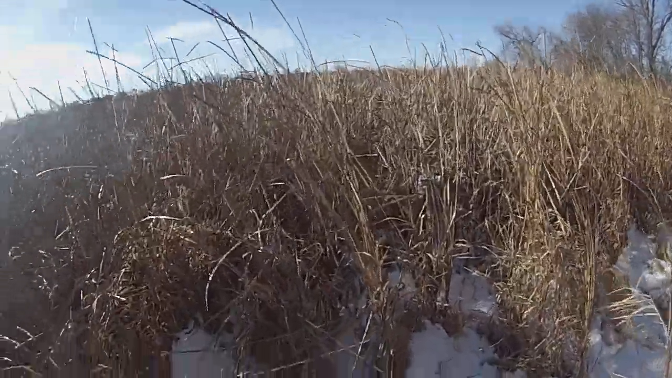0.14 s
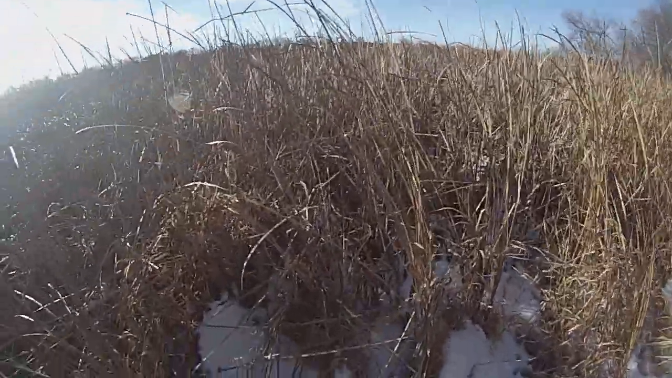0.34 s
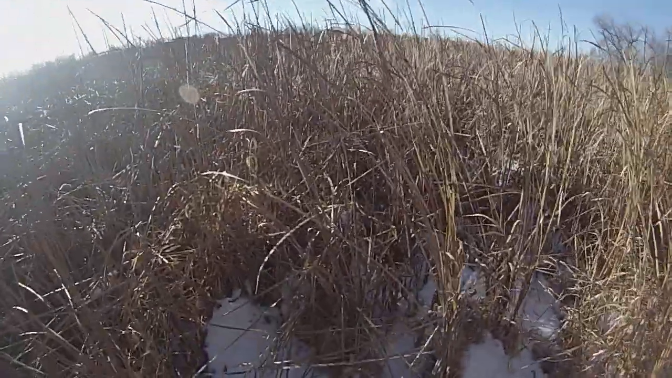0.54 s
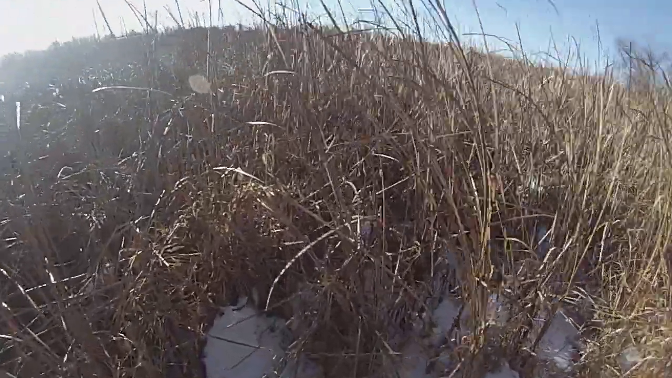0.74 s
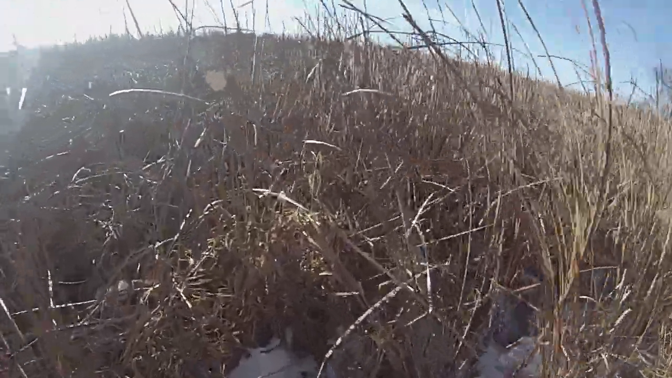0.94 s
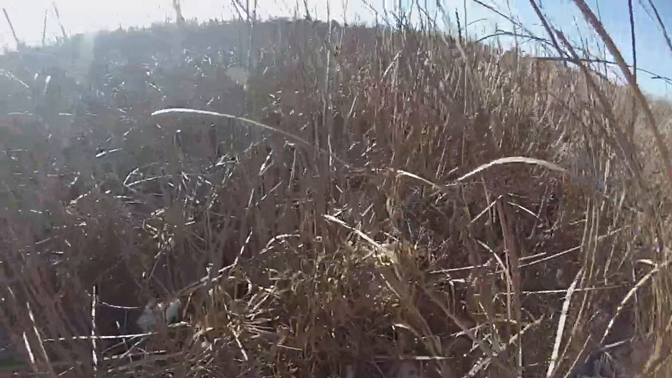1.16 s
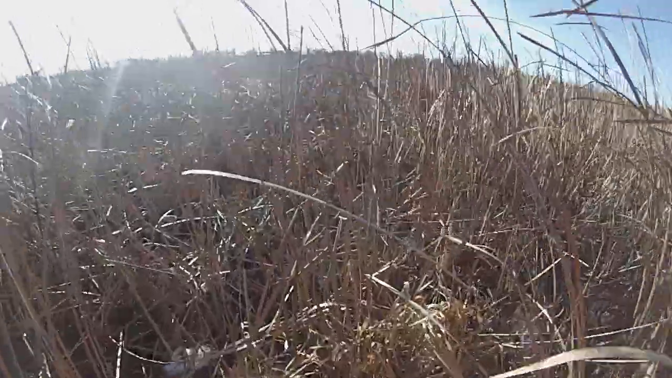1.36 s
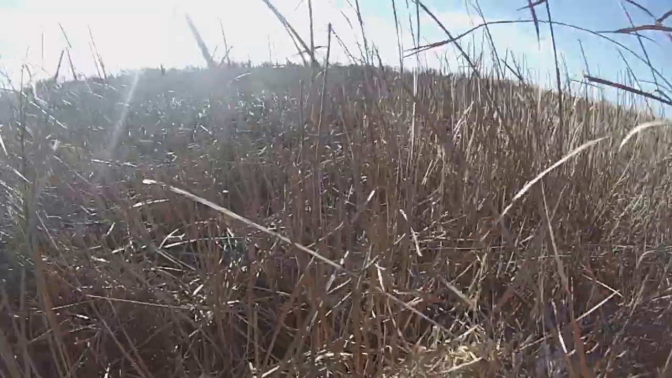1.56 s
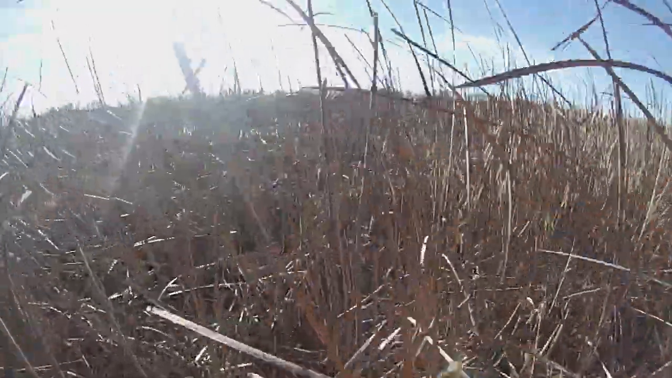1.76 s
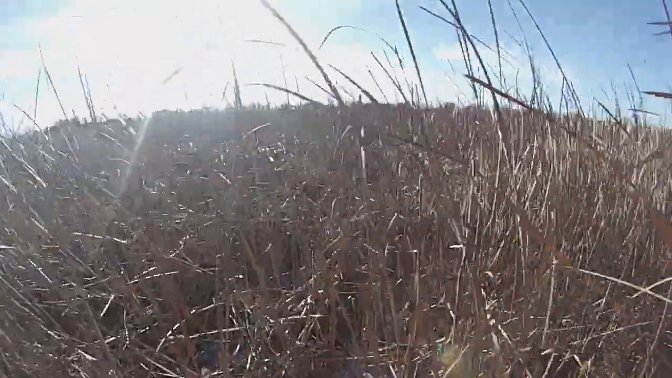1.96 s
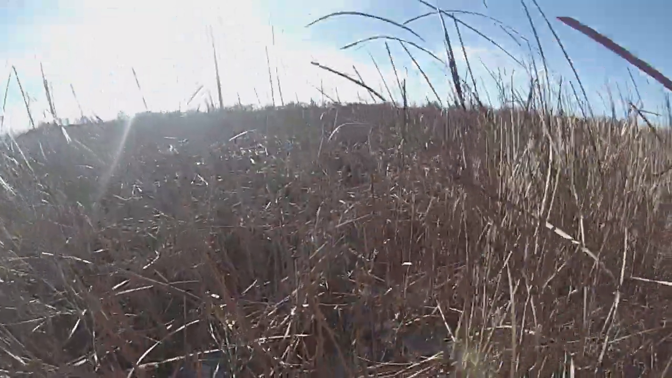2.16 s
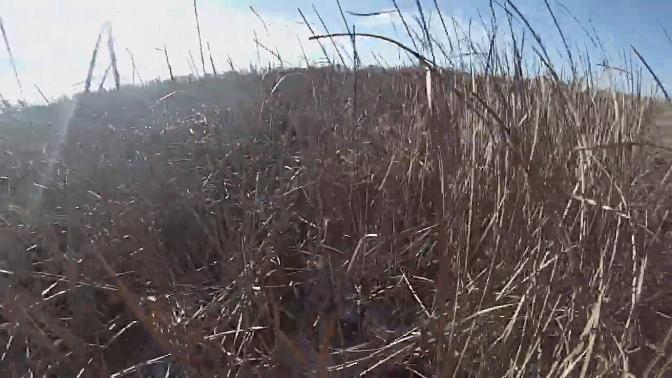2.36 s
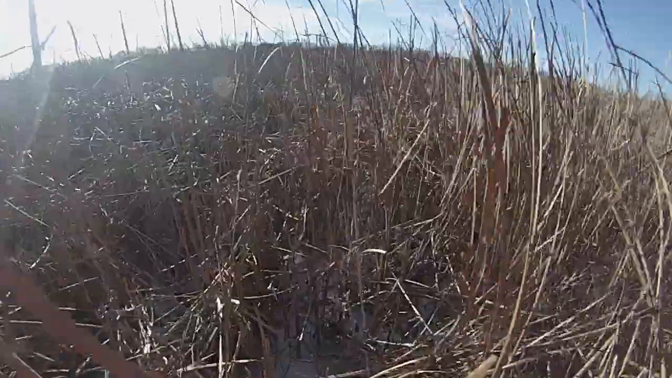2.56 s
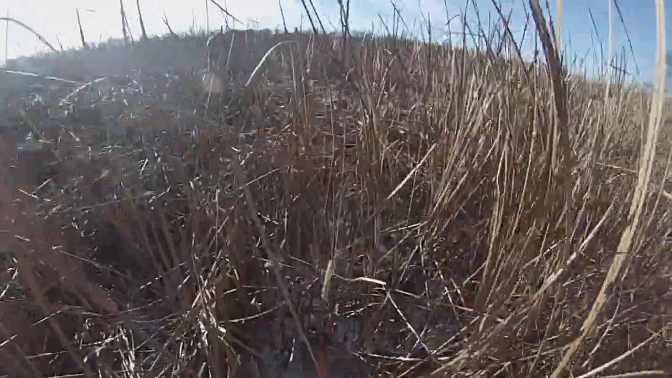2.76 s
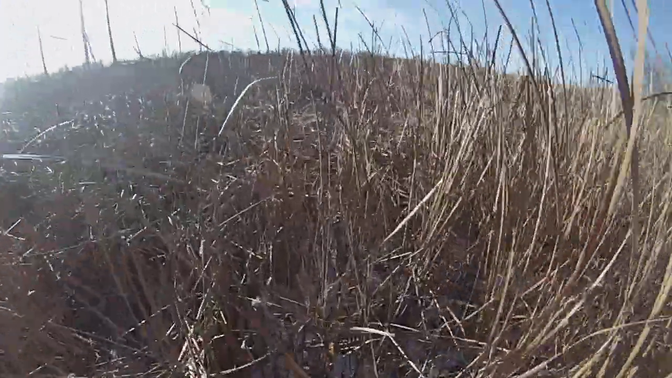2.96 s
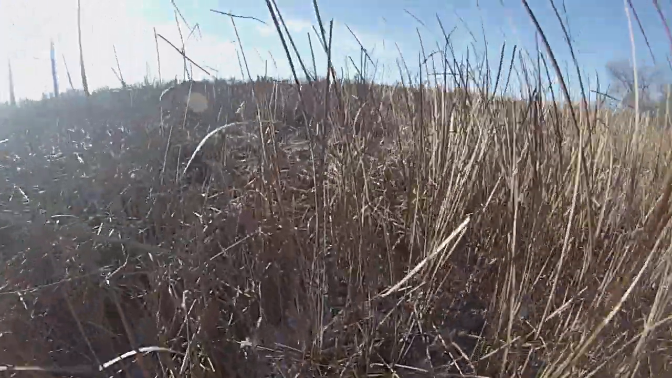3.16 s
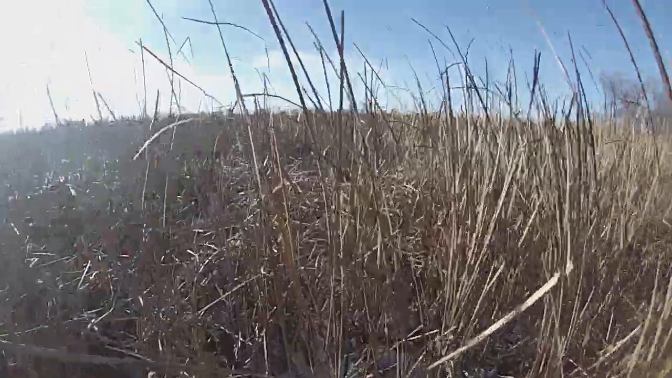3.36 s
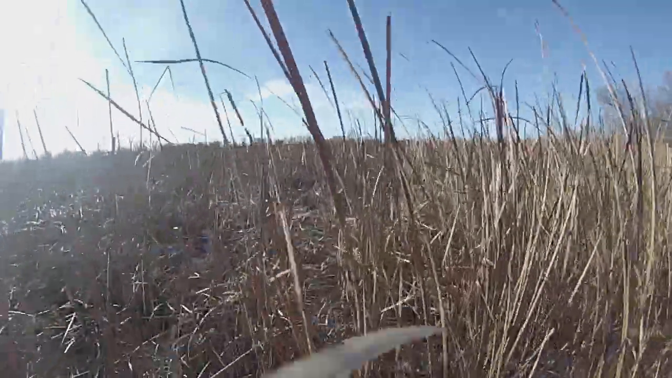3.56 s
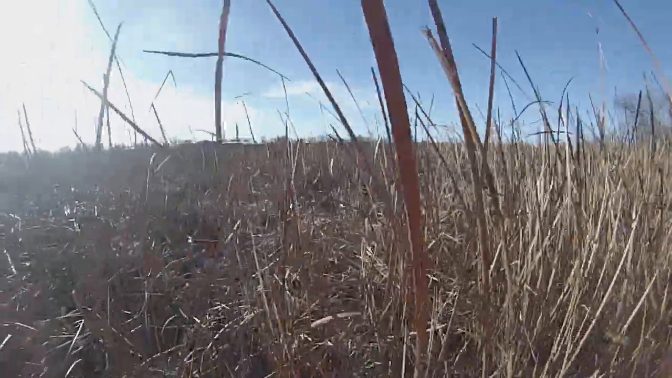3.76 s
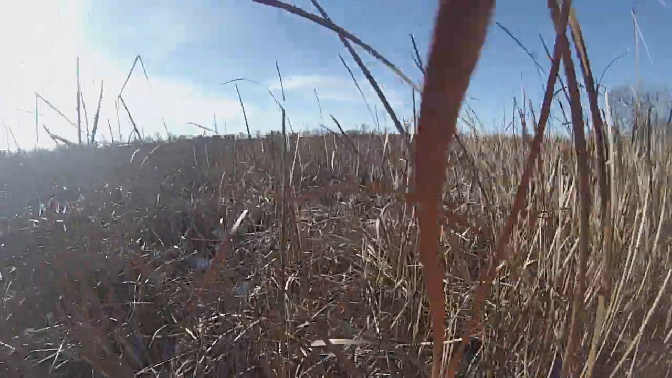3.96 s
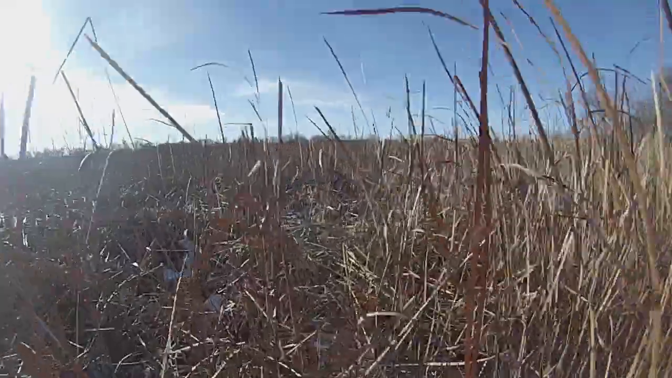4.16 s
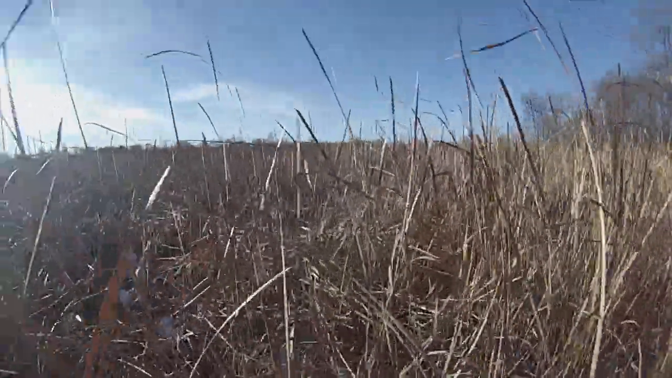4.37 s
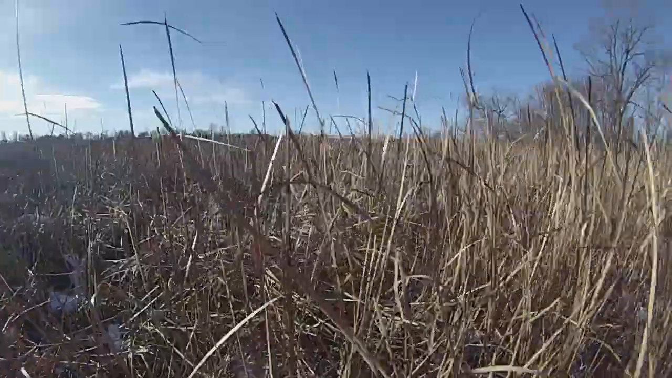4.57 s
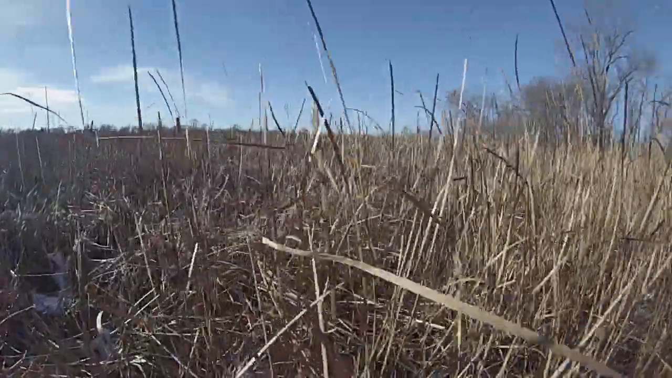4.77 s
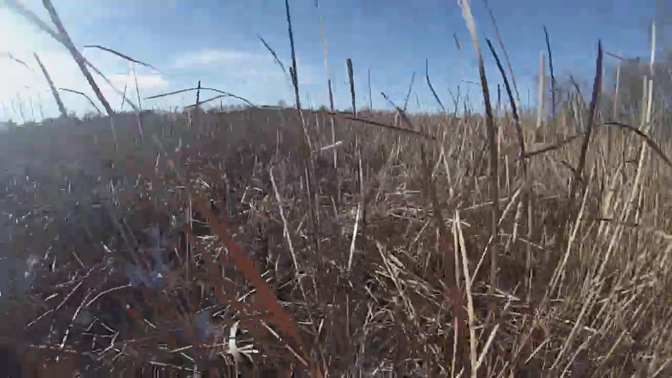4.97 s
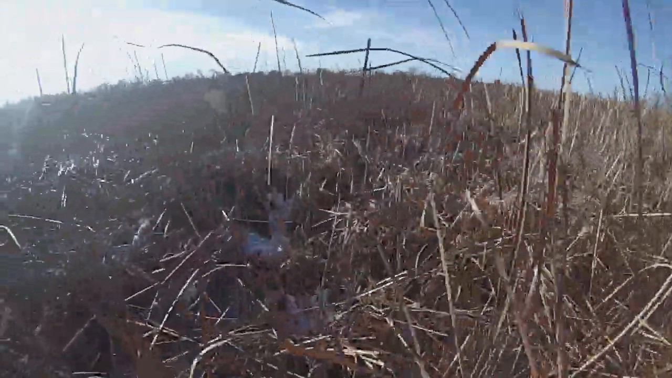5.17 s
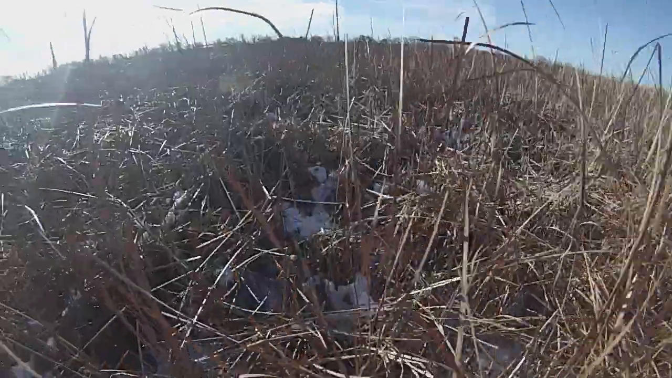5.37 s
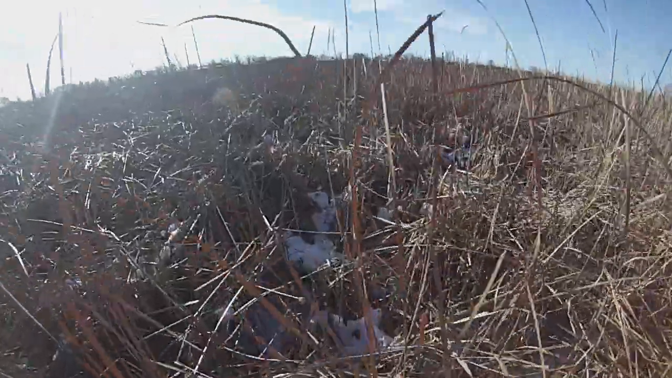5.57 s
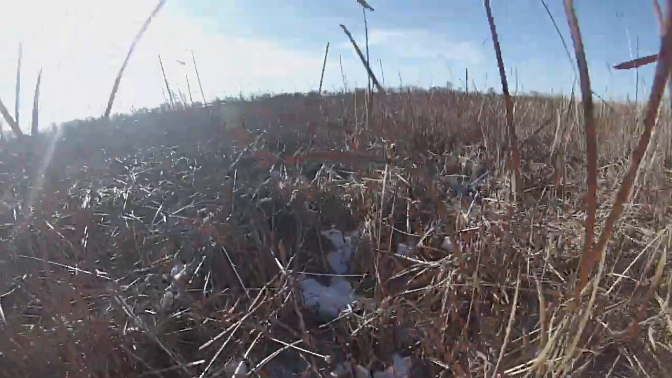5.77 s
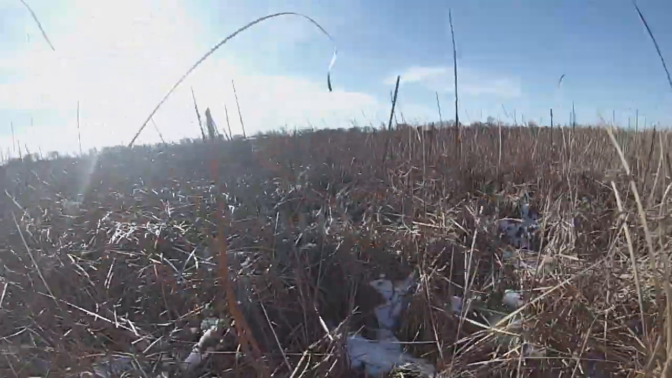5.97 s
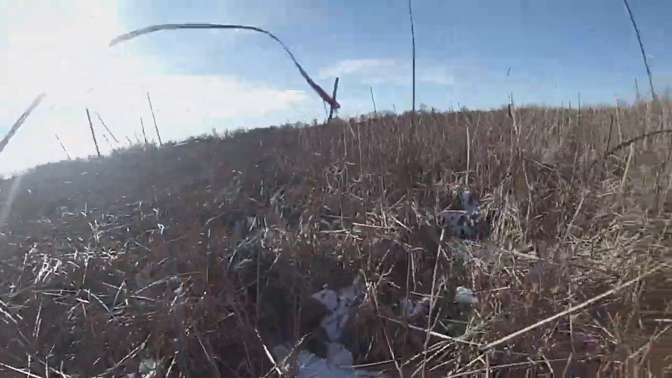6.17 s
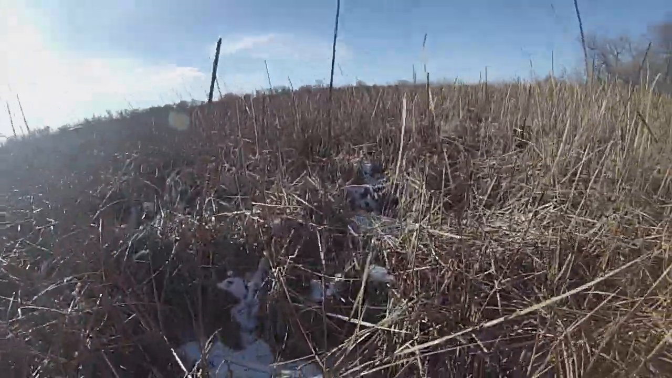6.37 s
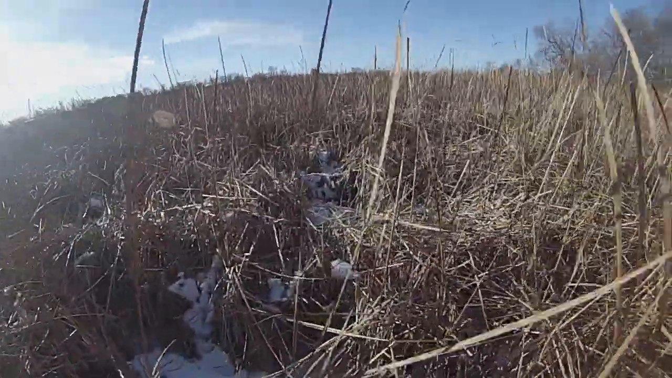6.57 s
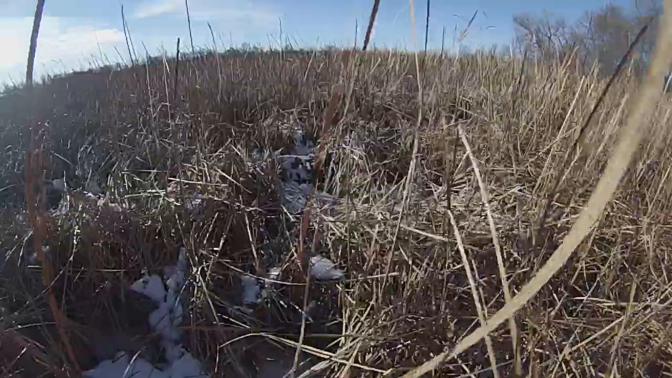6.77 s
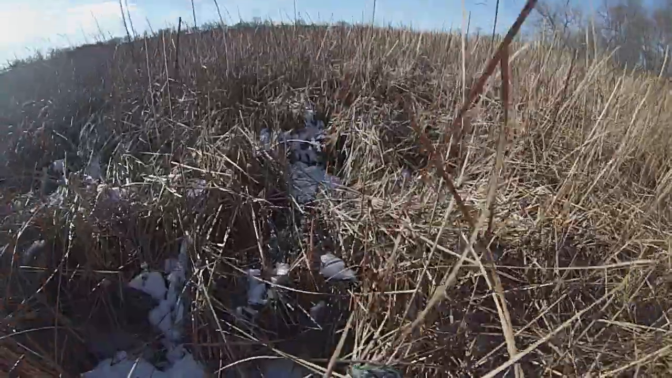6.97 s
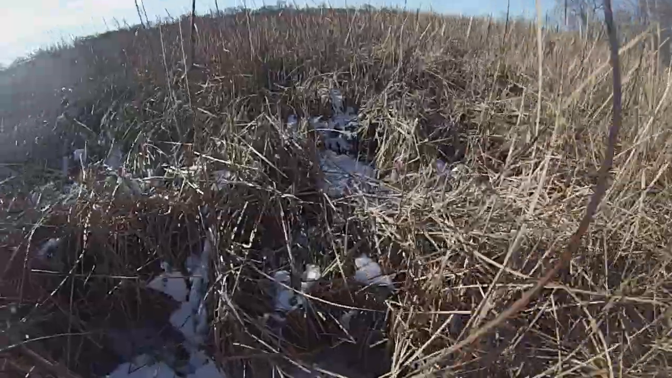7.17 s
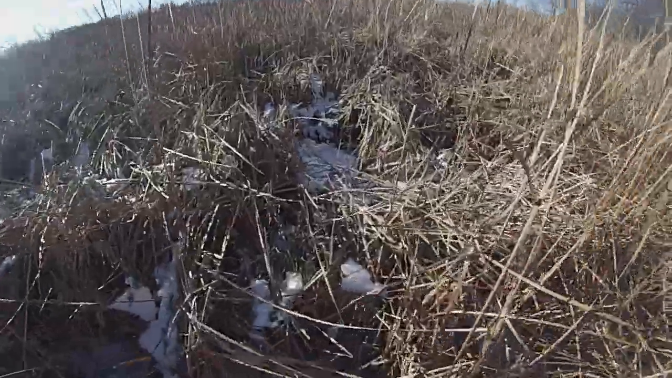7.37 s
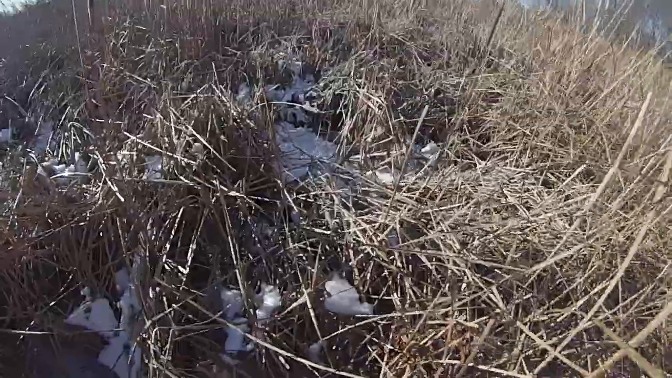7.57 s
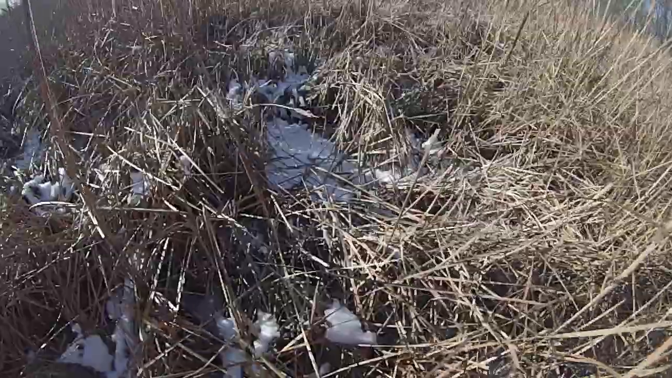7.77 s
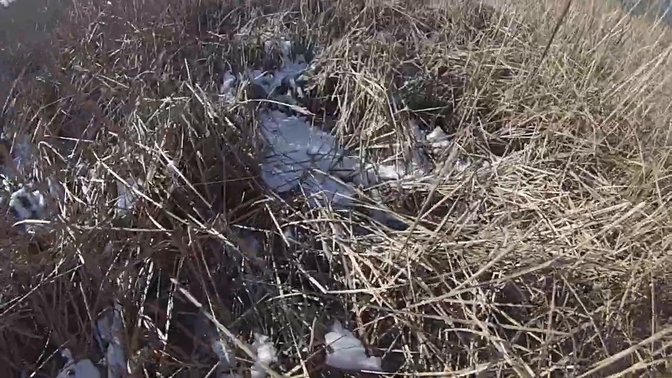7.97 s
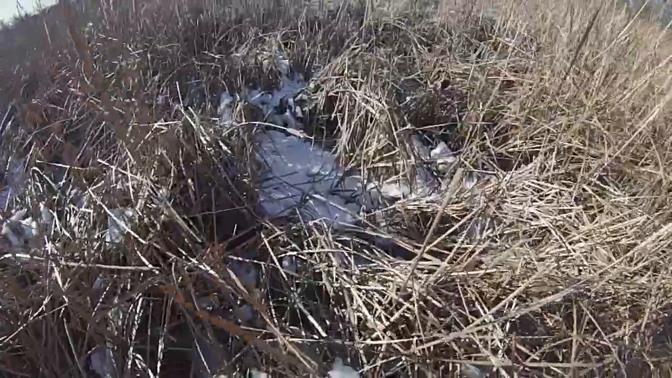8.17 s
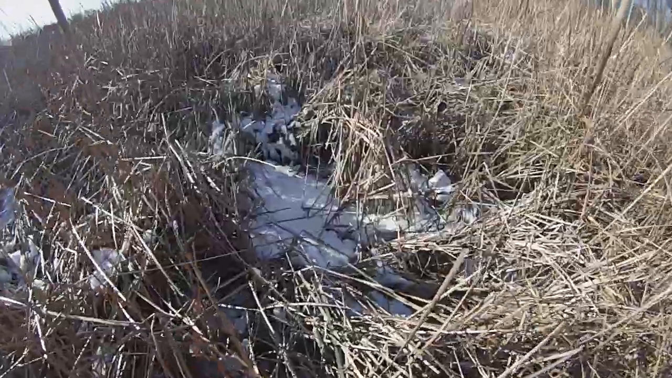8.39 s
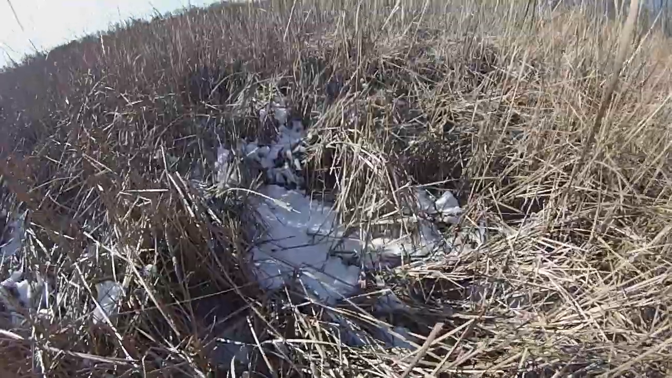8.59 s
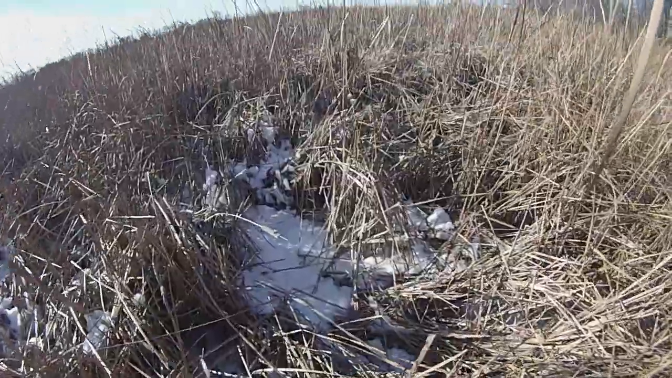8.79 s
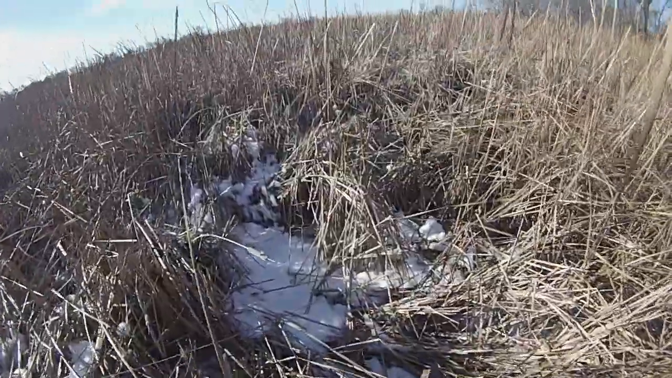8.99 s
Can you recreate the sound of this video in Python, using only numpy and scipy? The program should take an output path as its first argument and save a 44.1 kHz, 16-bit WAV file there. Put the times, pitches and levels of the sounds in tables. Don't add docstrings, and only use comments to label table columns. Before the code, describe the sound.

A small camera in a closed plastic housing is carried through a dry, snowy reed marsh. It starts nearly quiet with faint hiss, then crackling rustle swells as stalks brush past. Stalks tap and tear on the shell; one drags and chatters into a knock, and soon a much louder crack strikes. Rustling, tearing ticks and deep handling thumps continue to the end. Very close, dry, mono, boxy sound.

```python
import sys
import numpy as np
from scipy import signal
from scipy.fft import rfft, irfft
from scipy.io import wavfile
from scipy.ndimage import uniform_filter1d, minimum_filter1d

SR = 44100
rng = np.random.default_rng(int(sys.argv[2]) if len(sys.argv) > 2 else 0)


def wav_record(signal):
    frames = np.transpose(np.atleast_2d(signal))
    bounded = np.clip(frames, -1, 1)
    quanta = np.round(bounded * 32767).astype(np.int16)
    wavfile.write(sys.argv[1], SR, quanta)


def amplitude_ratio(level_db):
    exponent = np.asarray(level_db, float) / 20
    return 10 ** exponent


N = 398223


def rms_one(x):
    return x / np.sqrt(np.mean(x ** 2) + 1e-20)


def curve(rows):
    s, *columns = np.transpose(rows)
    return [np.interp(np.arange(N) / SR, s, c) for c in columns]


def band(x, low_hz, high_hz):
    return signal.sosfilt(signal.butter(2, [low_hz, high_hz], "band", fs=SR, output="sos"), x)


def drift(rate_hz):
    r = np.exp(-2 * np.pi * rate_hz / SR)
    slow = signal.lfilter([1], [1, -2 * r, r * r], rng.standard_normal(N + SR))
    return rms_one(slow[SR:])


def resonate(x, peaks):
    out = 0
    for k, (hz, width_hz, level_db) in enumerate(peaks):
        r = np.exp(-np.pi * width_hz / SR)
        a = [1, -2 * r * np.cos(2 * np.pi * hz / SR), r * r]
        out = out + (-1) ** k * amplitude_ratio(level_db) * signal.lfilter([(1 - r * r) / 2, 0, (r * r - 1) / 2], a, x)
    return out


def ring(hz, t60, size):
    t = np.arange(size) / SR
    onset = 1 - np.exp(-(2.68 * hz * t) ** 2)
    return np.sin(2 * np.pi * hz * t) * amplitude_ratio(-60 * t / t60) * onset


def add(out, s, piece):
    at = round(s * SR)
    out[at:at + len(piece)] += piece[:N - at]


def crackle(per_s, spread_db, clump_db, smooth):
    clump = drift(22.0)
    sizes = amplitude_ratio(spread_db * np.minimum(rng.exponential(1, N), 5)) * rng.choice([-1, 1], N)
    grains = sizes * (rng.random(N) < per_s / SR)
    return rms_one(amplitude_ratio(clump_db * clump) * (rms_one(grains) + smooth * rng.standard_normal(N)))


# t/s, push level/dB, brightness/dB
PUSH = [(0.0, -70, -5), (.55, -71.5, -2.5), (.8, -70.5, -2), (1.38, -68, -4), (1.62, -59.5, 0.5),
        (1.91, -61.5, -2.5), (2.78, -62.5, -2), (3.0, -59, 0), (3.8, -61, -5.5), (4.3, -61.5, -1.5),
        (5.09, -62, -3.5), (5.66, -61, -2), (6.21, -58.5, -2.5), (7.13, -60, -2), (7.68, -62.5, -1),
        (8.55, -61.5, -5), (8.88, -63, -2), (9.03, -57.5, -1.5)]
# start t/s, length/s, swell/dB
SWEEPS = [(0.865, 0.12, 5.5), (1.976, 0.23, 2.5), (2.344, 0.18, 4), (2.617, 0.1, 2.5), (2.87, 0.07, 3),
          (3.162, 0.22, 3), (3.642, .07, 1), (4.0, 0.15, 2), (4.72, 0.36, 2), (6.372, .08, 0),
          (6.52, 0.17, 2.5), (7.04, 0.053, 0.5), (7.197, 0.32, 4.5), (7.37, 0.11, 2.6), (7.848, 0.11, 4),
          (8.028, 0.13, 5.5), (8.625, 0.22, 2.5)]
# f/Hz, width/Hz, level/dB
LOW = [(349, 530, 0.11), (737, 860, 2)]
# f/Hz, width/Hz, level/dB
CAVITY = [(1590, 303, 0.5), (2474, 390, -1), (3106, 710, -3.5)]
# f/Hz, width/Hz, level/dB
PORT = [(5420, 510, 2), (6810, 390, -4), (7870, 590, -2.5), (9800, 1500, -6.5), (12200, 2750, -9),
        (15740, 1500, -20.5)]


def rustle():
    edge_s, fade_s = 0.072, 0.096
    brightens, sharpens = 0.54, 0.21
    push_db, shine_db = curve(PUSH)
    t = np.arange(0, N, 40) / SR
    swell_db = 0
    for s, length, db in SWEEPS:
        slope = np.minimum((t - s) / edge_s, (s + length - t) / fade_s)
        swell_db = swell_db + db * np.clip(slope + .5, 0, 1)
    swell_db = np.interp(np.arange(N) / SR, t, swell_db)
    grain = crackle(2500., spread_db=4.0, clump_db=1.5, smooth=1.9)
    low = rms_one(band(resonate(grain, LOW), 180, 1250))
    dull = amplitude_ratio(1.03 * drift(2.8)) * rms_one(band(resonate(grain, CAVITY), 1250, 4000))
    bright = rms_one(band(resonate(grain, PORT), 3900, 18000))
    top_gain = amplitude_ratio(sharpens * swell_db + 1.2 * drift(5.0))
    bright = bright + (top_gain - 1) * band(bright, 7000, 17000)
    body = amplitude_ratio(0.46) * (dull + amplitude_ratio(-11.5) * low)
    return amplitude_ratio(push_db + swell_db) * (body + amplitude_ratio(shine_db + brightens * swell_db + 2.0) * bright)


def snap(ring_hz, t60, ring_db, bright_db, knock_db, port, clean):
    fibres = rng.standard_normal(2500) * amplitude_ratio(-60 * np.arange(2500) / SR / (0.56 * t60))
    fibres[3] += clean
    crack = resonate(fibres, port)
    pair = ring(ring_hz, t60, size=2500) + 0.4 * ring(ring_hz * 1.3, 0.48 * t60, size=2500)
    pair = band(pair, 0.97 * ring_hz, 1.9 * ring_hz)
    push = band(np.arange(2500) == 3, 62, 777)
    knock = 0.56 * ring(820, 0.01, size=2500) + 0.19 * ring(560, 0.0086, size=2500)
    knock = knock + 1.15 * push / push.max()
    return amplitude_ratio(ring_db) * pair + amplitude_ratio(bright_db) * crack / np.abs(crack).max() + amplitude_ratio(knock_db) * knock


# t/s, level/dB, ring f/Hz, ring t60/s, bright level/dB
BLOWS = [
    (1.103, -21, 1850, 0.0039, -10),
    (1.7077, -11, 1900, 0.0053, -5),
    (4.2624, -4, 1720, 0.017, -21),
    (4.263, -9, 2550, 0.013, -33),
    (4.263, -15.5, 3186, 0.018, -28),
    (5.1593, 16, 2950, 0.0047, -5.5),
    (5.1594, 0.5, 1730, 0.0092, -17.5),
    (5.1594, -0.5, 2450, 0.008, -31),
    (5.1614, -2, 3140, 0.0063, -3.5),
]
# t/s, level/dB, ring f/Hz
CHATTER = [
    (4.2376, -20.5, 2180),
    (4.2425, -12.5, 1800),
    (4.245, -23.5, 2590),
    (4.249, -17, 1790),
    (4.252, -23, 1680),
    (4.257, -27, 2330),
    (4.2707, -21.5, 2350),
]
# f/Hz, t60/s, level after the side blow/dB, level after the front blow/dB
LONG_MODES = [(916, 0.047, -28.5, -38.5), (1660, 0.073, -39.5, -29.5), (1850, 0.19, -37.5, -34),
              (2180, 0.066, -24.5, -21.5), (2550, 0.036, -37.5, -18), (2950, 0.045, -35.5, -18),
              (4700, 0.045, -55, -28), (5220, 0.031, -45, -17.5), (710, 0.028, -24, -38)]
# f/Hz, width/Hz, level/dB
CRACK = [(5570, 1000, 0), (7700, 1800, 1), (10900, 1400, -4), (13300, 1300, -14.5)]


def blows():
    side_blow_s, front_blow_s = 4.2624, 5.1592
    knock_growth = 1.31
    out = np.zeros(N)
    for s, level_db, hz in CHATTER:
        add(out, s, snap(hz, 0.018, level_db, level_db - 26, level_db - 15.5, CRACK, clean=5.0))
    for s, level_db, hz, t60, bright_db in BLOWS:
        knock_db = knock_growth * level_db - 33.5
        add(out, s, snap(hz, t60, level_db + 3.5, level_db + bright_db, knock_db, CRACK, clean=4.4))
    for hz, t60, side_db, front_db in LONG_MODES:
        add(out, side_blow_s, amplitude_ratio(side_db) * ring(hz, t60, size=12000))
        add(out, front_blow_s, amplitude_ratio(front_db) * ring(hz, t60, size=12000))
    return signal.sosfilt(signal.butter(4, 14500, fs=SR, output="sos"), out)


# t/s, level/dB, ring f/Hz, knock level/dB
TAPS = [(0.5097, -43, 1660, -69), (1.038, -48, 1470, -51), (1.5997, -36, 1620, -50),
        (1.868, -37, 1830, -70), (2.0325, -41, 1740, -61), (2.1449, -32.5, 1540, -48),
        (2.146, -37, 2500, -64), (2.486, -34, 1640, -50), (3.6663, -54, 1540, -54),
        (3.693, -35.5, 1250, -46.5), (3.7227, -29, 2210, -46.5), (3.8114, -42, 1940, -50),
        (3.8533, -46, 1800, -65), (3.889, -40, 1700, -66), (3.9556, -33, 2940, -57),
        (3.9893, -34, 2050, -53), (4.023, -38, 1840, -48), (4.195, -26, 1780, -70),
        (4.292, -39.5, 1860, -46.5), (4.919, -45, 1510, -48), (5.5757, -40, 1970, -77),
        (5.9496, -31.5, 1700, -48), (6.4411, -35, 1660, -67), (6.9272, -40, 1570, -53),
        (7.2604, -48, 1560, -47), (8.1195, -44, 1650, -61), (8.44, -48, 1560, -53)]
# t/s, level/dB, ring level/dB
TEARS = [(0.68, -59, -53), (0.748, -58.5, -66), (0.8094, -58, -56), (0.849, -63, -58), (1.367, -52.5, -58),
         (1.442, -49.5, -50), (1.4833, -47, -54), (1.504, -48, -52), (1.7386, -47, -50), (1.843, -55, -47),
         (1.868, -49, -55), (2.0325, -51, -55), (2.343, -51, -58), (3.2016, -47, -42), (3.533, -53, -47),
         (4.3375, -55, -44), (4.354, -41.5, -45), (5.5454, -48.5, -43), (5.837, -43.5, -41),
         (6.4412, -48, -55), (6.5744, -47, -49), (6.6476, -47, -37), (6.7053, -49, -42), (7.2142, -49, -37),
         (7.275, -42.5, -52), (7.294, -39, -44), (7.379, -43, -45), (7.4403, -37.5, -42),
         (7.4609, -40, -39), (8.0784, -49, -47)]
TEAR_TILTS = [1, .1, .1, .1, -11, -2.1, -2.1, .1, .1, 2.1, 2.1, 2.1, .1, -2, -3, -5, -1, -2.1, -3, .1, 2,
              .1, .1, .1, 5, 5, -2, 2.1, -4, .1]
# f/Hz, width/Hz, level/dB
TEAR_PORT = [(5370, 800, -2), (8030, 910, 1), (9760, 1800, -3.5), (12500, 1500, -6.5)]
# t/s, length/s, level/dB
FLECKS = [
    (.092, 0.026, -70),
    (.188, .03, -73),
    (.228, 0.043, -72),
    (0.431, 0.018, -70),
]


def ticks():
    lowest_hz, highest_hz = 1500, 2710
    out = np.zeros(N)
    for s, level_db, hz, knock_db in TAPS:
        add(out, s + .0003, snap(hz, 0.016, level_db - 2.5, level_db - 22, knock_db + 3.5, TEAR_PORT, clean=.1))
    for (s, level_db, ring_db), tilt_db, chance in zip(TEARS, TEAR_TILTS, rng.random(len(TEARS))):
        hz = lowest_hz * (highest_hz / lowest_hz) ** (chance ** 2)
        port = [(port_hz, width_hz, db + tilt_db * np.log2(port_hz / 8000))
                for port_hz, width_hz, db in TEAR_PORT]
        add(out, s + .0003, snap(hz, 0.036, ring_db - 4.5, level_db + 6.0, level_db - 16, port, clean=.1))
    for s, length, level_db in FLECKS:
        whisper = band(rng.standard_normal(4000), 9000, 9700)[:int(length * SR)]
        add(out, s, amplitude_ratio(level_db) * rms_one(whisper))
    return out


# t/s, pressure level/dB
DRAG = [
    (3.8, -70),
    (3.812, -52),
    (3.83, -68),
    (3.945, -57),
    (3.965, -47),
    (4.07, -46),
    (4.16, -50.5),
    (4.19, -50.5),
    (4.232, -51),
]
# f/Hz, width/Hz, level/dB
PLATE = [(430, 250, -6), (890, 110, 2), (1220, 270, -4.5)]
# f/Hz, width/Hz, level/dB
SHELL = [(1800, 210, 3), (2450, 260, -3), (2940, 260, 0.5), (3880, 430, -13.5)]


def drag():
    source = crackle(1800., spread_db=4.5, clump_db=1.2, smooth=0.5)
    t = np.arange(N) / SR
    touching = np.clip(np.minimum(t - DRAG[0][0], DRAG[-1][0] - t) / 0.011, 0, 1)
    plate_db = -7.5 + 28 * np.clip(t - 4.0, 0, .2)
    plate = rms_one(band(resonate(source, PLATE), 250, 1600))
    cavity = rms_one(band(resonate(source, SHELL), 1300, 5000))
    bright = rms_one(band(resonate(source, PORT), 4300, 16000))
    return touching * amplitude_ratio(curve(DRAG)[0]) * (amplitude_ratio(plate_db) * plate + cavity + amplitude_ratio(-18) * bright)


# t/s, length/s, plate level/dB, cavity level/dB
RUBS = [(2.189, .012, -57, -64), (3.987, 0.022, -54, -40), (4.032, .006, -52, -43), (4.072, .006, -49, -40),
        (4.082, .005, -48, -45), (4.102, .005, -50, -48), (4.123, .012, -46.5, -49),
        (4.144, .016, -47, -47), (4.222, .016, -50.5, -45), (4.2373, .004, -40.5, -26),
        (4.241, 0.011, -34, -27.5), (4.255, .007, -38.5, -35.5), (4.267, .012, -38, -32.5),
        (4.289, .007, -50.5, -42), (6.018, .014, -57, -66), (8.103, .05, -58, -68), (8.125, .014, -57, -66),
        (8.42, .04, -63, -65)]
# t/s, length/s, level/dB, first f/Hz, last f/Hz
SQUEAKS = [
    (.838, .022, -65, 3000, 2800),
    (3.549, 0.024, -56, 3800, 3400),
    (3.587, .01, -56, 3330, 3700),
    (3.602, .03, -62, 3480, 3400),
    (3.587, 0.019, -58, 2600, 2520),
    (5.574, 0.009, -54, 3900, 4000),
    (3.843, .026, -54, 2950, 2500),
]


def rubs():
    to_plate, to_cavity, squeaks = np.zeros((3, N))
    for s, length, plate_db, cavity_db in RUBS:
        grit = (rng.standard_normal(3000) * rng.exponential(1, 3000))[:int(length * SR)]
        grit = grit * np.linspace(1, .4, len(grit))
        add(to_plate, s, amplitude_ratio(plate_db + 12.5) * grit)
        add(to_cavity, s, amplitude_ratio(cavity_db + 8.0) * grit)
    for s, length, level_db, first_hz, last_hz in SQUEAKS:
        size = int(length * SR)
        flutter = 1 + 0.56 * rms_one(band(rng.standard_normal(2000), 40, 250))[:size]
        tone = np.sin(2 * np.pi * np.cumsum(np.linspace(first_hz, last_hz, size)) / SR)
        add(squeaks, s, amplitude_ratio(level_db + 0.5) * np.hanning(size) ** .5 * flutter * tone)
    plate = band(resonate(to_plate + 1e-18, PLATE + [(650, 308, -2.5)]), 250, 1500)
    cavity = band(resonate(to_cavity + 1e-18, SHELL), 1300, 5000)
    return plate + cavity + squeaks


# t/s, level/dB, starting f/Hz
THUDS = [(.012, -33.5, 44), (.952, -27, 37), (1.768, -30.5, 53), (1.812, -28.5, 38), (2.49, -35.5, 50),
         (3.444, -35.5, 73), (3.467, -22.5, 32), (3.908, -33, 53), (4.147, -28.5, 55), (4.261, -27, 40),
         (4.33, -28.5, 58), (5.012, -32.5, 48), (5.845, -26, 48), (5.895, -28, 42), (6.482, -28, 47),
         (6.69, -21, 47), (6.76, -31, 22), (7.522, -26.5, 40), (8.108, -29, 59), (8.14, -17, 35),
         (8.235, -28, 20), (8.43, -20.5, 33)]


def thuds():
    peak_cycles, sag = 0.59, .25
    out = np.zeros(N)
    for s, level_db, hz in THUDS:
        cycles = np.arange(int(6 * SR / hz)) * hz / SR
        swing = (cycles / peak_cycles * np.exp(1 - cycles / peak_cycles)) ** 1.6
        add(out, s + 0.0033, -amplitude_ratio(level_db) * swing * np.sin(2 * np.pi * np.log1p(sag * cycles) / sag))
    return out


def surges(rows, rest_db, lift_db):
    rise_share = 0.83
    t = np.arange(0, N, 40) / SR
    out = amplitude_ratio(rest_db + 4 * drift(4.0)[::40])
    for s, level_db, half_s in rows:
        away_s = np.maximum(t - s, (s - t) / rise_share)
        out = np.maximum(out, amplitude_ratio(level_db + lift_db) * .5 ** (away_s / (0.7 * half_s)) ** 0.89)
    return np.interp(np.arange(N) / SR, t, out)


# t/s, level/dB, time to lose half/s
SWAYS = [(.06, -45, 0.047), (1.02, -42.5, 0.057), (1.87, -46.5, 0.065), (2.035, -50, .043),
         (2.39, -49.5, 0.12), (2.553, -42, 0.062), (2.9, -52.5, 0.051), (3.26, -51, 0.059),
         (3.55, -44, .04), (3.68, -49, 0.069), (3.98, -48.5, .07), (4.23, -43, .04), (4.38, -45.5, 0.074),
         (5.09, -44, 0.089), (5.96, -40, 0.077), (6.28, -47.5, 0.04), (6.87, -41, 0.028), (7.01, -55, .1),
         (7.385, -51.5, .07), (7.63, -38.5, 0.041), (8.21, -37, 0.038), (8.33, -48, .05), (8.5, -38, .035)]
# t/s, level/dB, time to lose half/s
JOLTS = [(2.33, -54, .04), (2.648, -43.5, 0.027), (3.612, -50, .025), (4.025, -46.5, .025),
         (4.225, -44, 0.022), (4.414, -51, .026), (4.86, -49, 0.037), (4.936, -49.5, .04),
         (5.93, -42, 0.028), (6.044, -49, .05), (6.25, -48.5, .028), (6.64, -46, .02), (6.83, -47, .03),
         (7.26, -54, 0.071), (7.47, -43, 0.034), (7.67, -54, .04), (8.2, -46, 0.027), (8.47, -45, .03),
         (8.8, -56, .04)]
# t/s, level/dB, time to lose half/s
BUMPS = [(1.76, -55, 0.018), (2.499, -51, 0.018), (2.63, -58, 0.018), (3.445, -41, 0.014),
         (3.908, -46, 0.018), (4.049, -53, 0.018), (4.159, -45, 0.018), (4.269, -40, 0.02),
         (4.349, -40, 0.015), (5.019, -64, 0.018), (5.859, -47, 0.018), (5.959, -52, 0.018),
         (6.69, -42, 0.018), (7.539, -54, 0.018), (8.122, -39, 0.016), (8.43, -41, 0.015)]


def shake():
    out = 0
    jolt_size = surges(JOLTS, -64, lift_db=2.5)
    movements = [(surges(SWAYS, -54.5, lift_db=7.5), 19.65, 38.6, 49.0),
                 (jolt_size, 41.3, 69.8, 140),
                 (surges(BUMPS, -86.5, lift_db=-1.5), 75, 140, 170)]
    for size, low_hz, high_hz, top_hz in movements:
        wobble = band(rng.standard_normal(N + SR), low_hz, high_hz)[SR:]
        swing = np.sqrt(uniform_filter1d(wobble ** 2, size=int(SR / low_hz)))
        moved = size * wobble / (swing + 0.079 * np.std(wobble))
        out = out + signal.sosfiltfilt(signal.butter(2, top_hz, fs=SR, output="sos"), moved)
    creak = rms_one(band(rng.standard_normal(N), 77, 190))
    return out + amplitude_ratio(-34) * jolt_size ** 0.85 * creak


# f/Hz, level/(dB per Hz)
HISS = [(35, -33.5), (60, -10), (171, -12.5), (226, -14), (521, -19), (688, -21.5), (810, -19.5),
        (7370, -39), (9080, -34), (15500, -51)]


def hiss():
    hz, level_db = np.transpose(HISS)
    grid = np.fft.rfftfreq(N, 1 / SR) + 1
    shape = amplitude_ratio(np.interp(np.log(grid), np.log(hz), level_db))
    return amplitude_ratio(-64) * rms_one(irfft(rfft(rng.standard_normal(N)) * shape, N))


def scene():
    edge = signal.cheby2(20, 50, 15600, fs=SR, output="sos")
    soft = signal.sosfilt(edge, rustle() + drag() + rubs() + hiss() + ticks())
    return (soft + blows() + shake() + thuds())[None]


def band_limit(x):
    return signal.sosfilt(signal.butter(12, 16550, fs=SR, output="sos"), x)


def record(dry):
    ceiling_db, ahead_s, release_db_per_s = .3, .016, 26.5
    over = np.maximum(20 * np.log10(np.abs(dry[0]) + 1e-9) - ceiling_db, 0)
    held = -minimum_filter1d(-over, size=2 * int(ahead_s * SR) + 1)
    ramp = release_db_per_s * np.arange(N) / SR
    cut_db = np.maximum.accumulate(held + ramp) - ramp
    mix = dry * amplitude_ratio(-uniform_filter1d(cut_db, size=90))
    return band_limit(mix)


dry = scene()
out = record(dry)
wav_record(out)
```